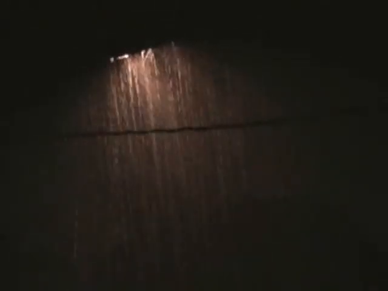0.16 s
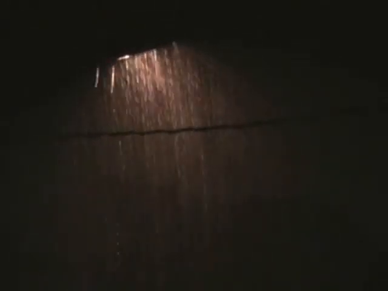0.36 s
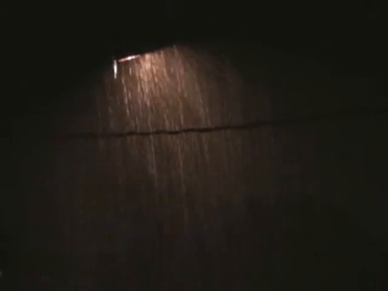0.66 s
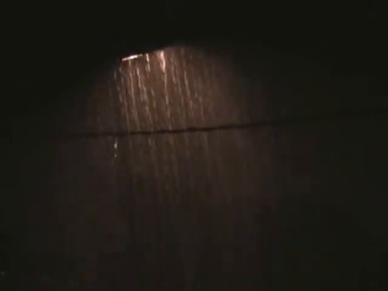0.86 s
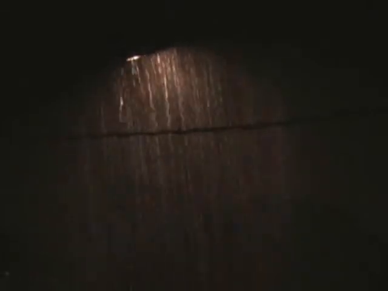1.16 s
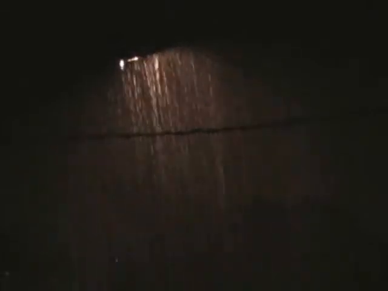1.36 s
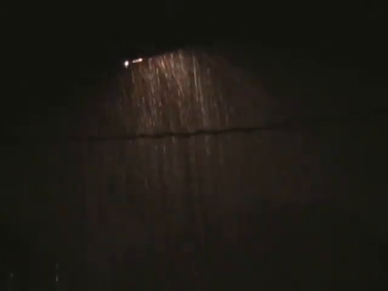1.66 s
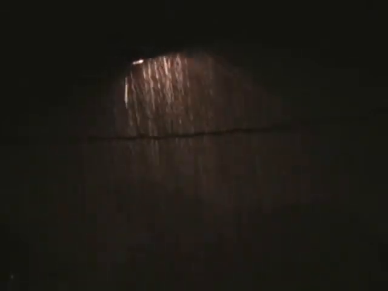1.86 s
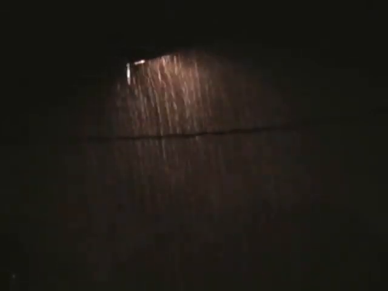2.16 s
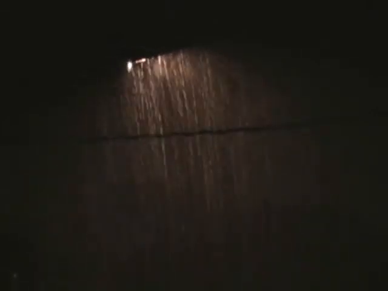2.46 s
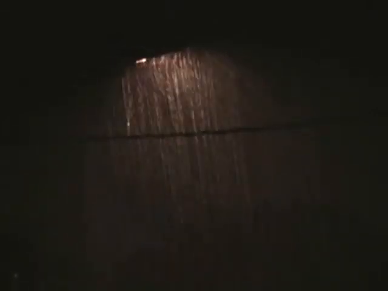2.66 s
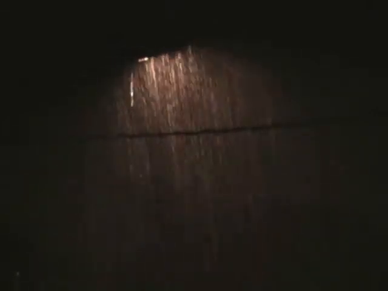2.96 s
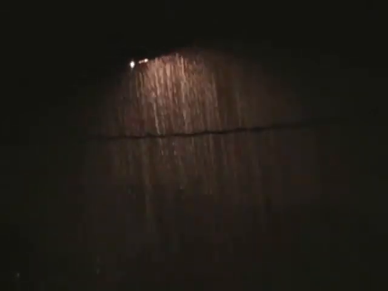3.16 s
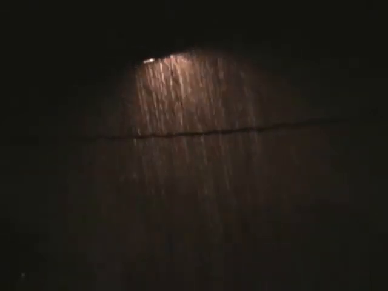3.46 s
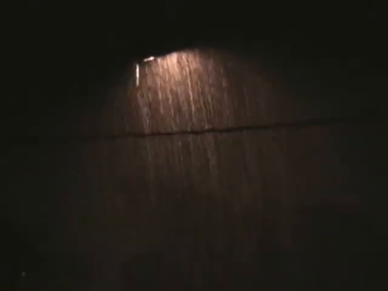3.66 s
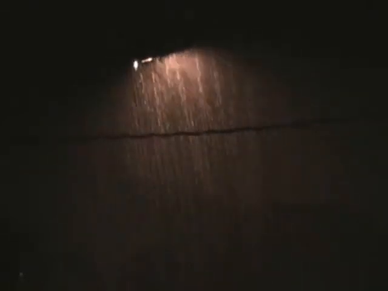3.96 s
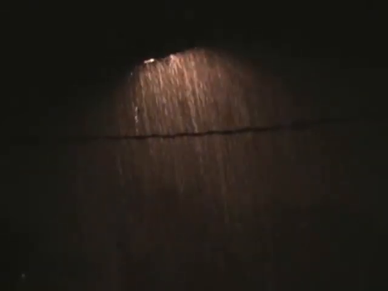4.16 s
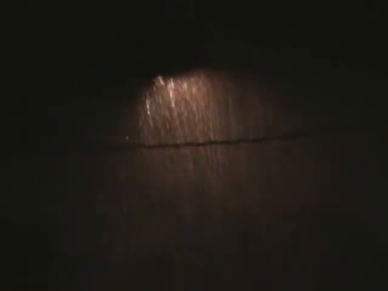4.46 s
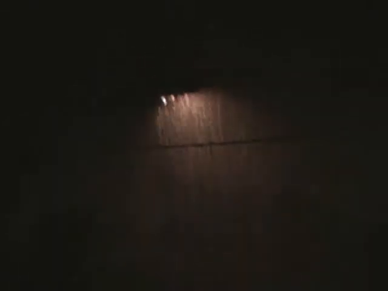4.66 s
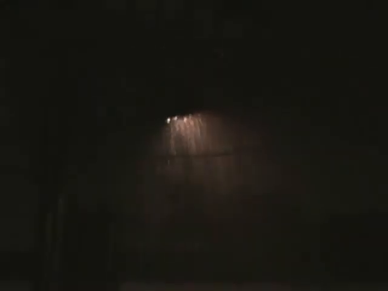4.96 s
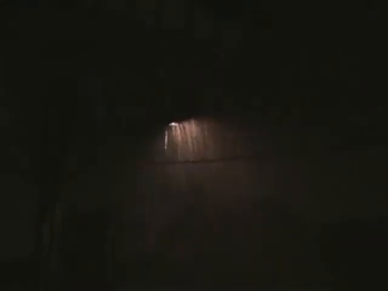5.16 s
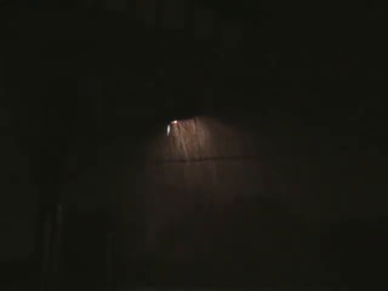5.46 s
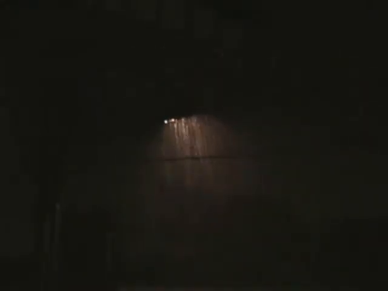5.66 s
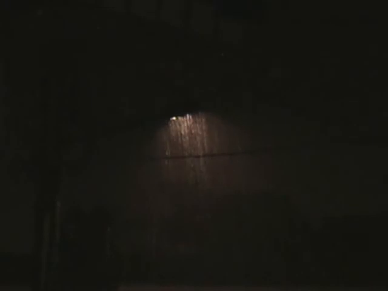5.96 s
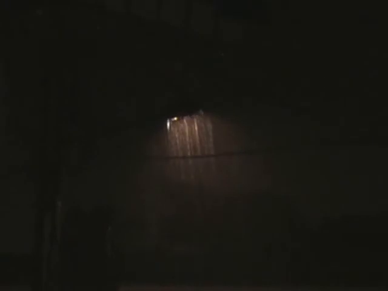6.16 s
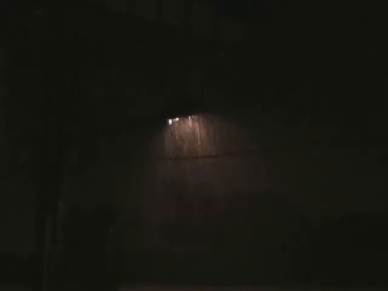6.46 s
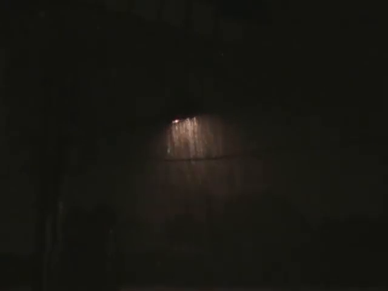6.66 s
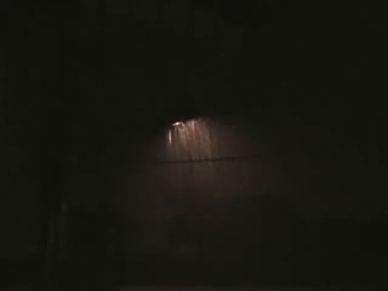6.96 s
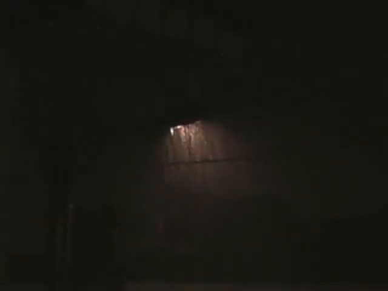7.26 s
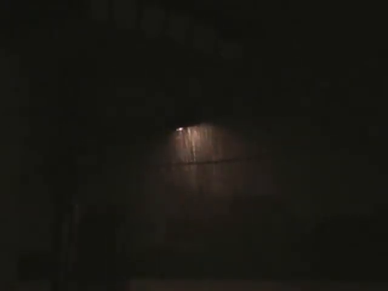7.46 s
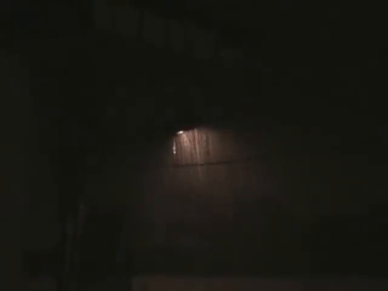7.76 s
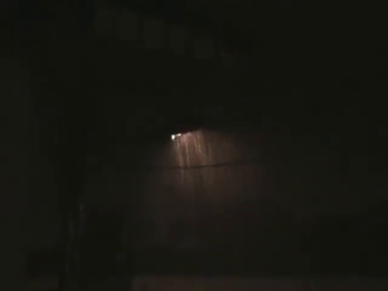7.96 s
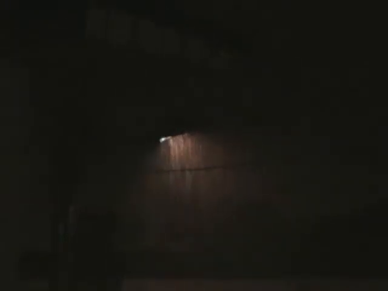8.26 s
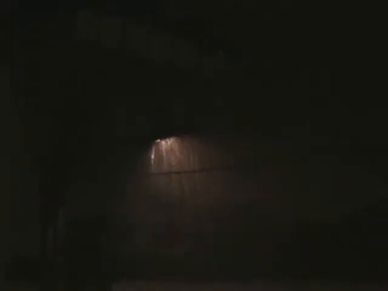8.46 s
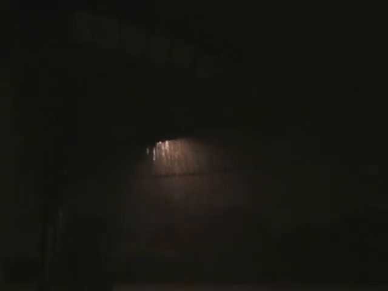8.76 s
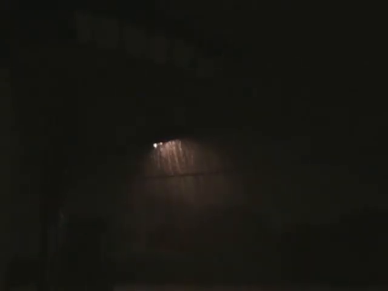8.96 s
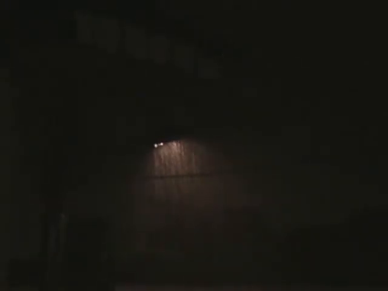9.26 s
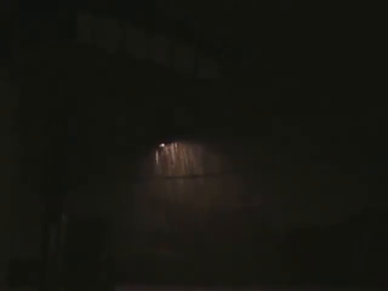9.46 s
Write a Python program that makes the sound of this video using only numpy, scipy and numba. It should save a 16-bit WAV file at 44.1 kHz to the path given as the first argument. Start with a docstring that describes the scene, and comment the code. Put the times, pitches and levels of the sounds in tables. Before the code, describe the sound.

A steady night downpour hisses on paving and drums softly on roofs, crackling with countless splashes and a few loud nearby drops.

```python
"""Heavy rain on roofs and paving, about ten seconds.
From the start, filtered noise gives a dull drumming and a bright hiss, while thousands of short
damped rings make splashes and patter; the hiss dips a little near 1, 4 and 7.5 s and at the end.
From 0.15 s on, big drops tick close by, the loudest at 7.25 s, and stray heavy drops fall at random.
A limiter ducks everything briefly around loud peaks, and the treble's stereo width flickers throughout."""
import sys
import numpy as np
from scipy import signal
from scipy.fft import rfft, irfft, next_fast_len
from scipy.io import wavfile
from scipy.ndimage import uniform_filter1d, minimum_filter1d, map_coordinates
from numba import njit

SR = 44100
rng = np.random.default_rng(int(sys.argv[2]) if len(sys.argv) > 2 else 0)


def magnitude_from_level(level_db):
    """Linear magnitude for a level in decibels (20 dB per decade)."""
    exponent = np.asarray(level_db, float) / 20
    return 10 ** exponent


def output_pcm(signal):
    """Save a mono or channel-first signal as 16-bit PCM at the path in sys.argv[1].

    Samples are clipped to [-1, 1] before scaling.
    """
    pcm = np.clip(np.atleast_2d(signal).T, -1, 1) * 32767
    wavfile.write(sys.argv[1], SR, np.round(pcm).astype(np.int16))


N = 424241  # length in samples


def unit(x):
    """Scale to rms 1."""
    return x / np.sqrt(np.mean(x ** 2) + 1e-20)


def along(points, hz):
    """Read a curve of (f/Hz, value) points, joined by straight lines on a log frequency axis."""
    f, value = np.transpose(points)
    return np.interp(np.log(hz + 1), np.log(f + 1), value)


def wobble(rate):
    """A smooth random curve through `rate` random points a second."""
    points = rng.standard_normal(int(N * rate / SR) + 4)
    return map_coordinates(points, [np.arange(N) * rate / SR])


def filtered(x, response):
    """Filter x by multiplying its spectrum by a (possibly complex) response of frequency."""
    size = next_fast_len(N + 8192)  # spare room keeps the end from wrapping onto the start
    spectrum = rfft(x, size) * response(np.fft.rfftfreq(size, 1 / SR))
    return irfft(spectrum, size)[..., :N]


# How alike the left and right noise are: (f/Hz, correlation)
LIKENESS = [(40, .82), (150, 0.93), (640, 0.77), (1400, 0.83), (3000, 0.84), (5500, 0.88), (8000, 0.94),
            (11000, 0.92), (15000, 0.2)]
# How much louder the noise is on the left than on the right: (f/Hz, level/dB)
LEFT_LOUDER = [(60, 0), (180, 3.5), (550, 2.5), (1650, 0.5), (4970, 1), (15000, -1.5)]
# How far the left noise runs ahead of the right: (f/Hz, phase/rad)
LEFT_AHEAD = [(0, 0), (600, 0.35), (1980, 0.042), (15300, -0.0)]


def rush(spectrum, patchy_db):
    """Many drops fused into stereo noise of rms 1, with patches of random gain, as two close ports hear it."""
    patches = signal.stft(rng.standard_normal((2, N)), nperseg=512)[2]
    field = rng.standard_normal(patches.shape[1:])
    field = uniform_filter1d(field, size=12, axis=0)  # smooth across frequency
    field = uniform_filter1d(field, size=8, axis=1)  # smooth across time
    pair = signal.istft(patches * magnitude_from_level(patchy_db * unit(field)), nperseg=512)[1][:, :N]

    def mid_and_side(hz):
        # a small angle gives mostly mid, so the two sides are much alike
        angle = np.arccos(np.clip(along(LIKENESS, hz), -1, 1)) / 2
        return magnitude_from_level(along(spectrum, hz)) * [np.cos(angle), np.sin(angle)]

    def left_and_right(hz):
        # each side takes half of the level and phase difference
        tilt = magnitude_from_level(along(LEFT_LOUDER, hz) / 2) * np.exp(.5j * along(LEFT_AHEAD, hz))
        return [tilt, 1 / tilt]

    mid, side = filtered(pair, mid_and_side)
    return unit(filtered(np.array([mid + side, mid - side]), left_and_right))


# Course of the rain before the random swell: (t/s, drumming level/dB, hiss level/dB)
RAIN_COURSE = [(0, -27, -17.5), (1, -27, -19), (2.3, -26, -17.5), (4, -27, -18.4), (4.8, -26.5, -17.5),
               (7.5, -26.5, -18.5), (9.62, -26.5, -19)]
# Relative spectrum of the roof drumming: (f/Hz, level/dB per Hz)
DRUMMING_SPECTRUM = [(20, -55), (45, -29), (72, -17), (198, -9), (297, -4), (743, -1.5), (1050, 1),
                     (1340, -4), (1520, -10.5), (2000, -5.5), (2600, -24), (4400, -120)]
# Relative spectrum of the splash hiss: (f/Hz, level/dB per Hz)
HISS_SPECTRUM = [(710, -44), (1200, -2), (1540, -2.5), (1800, -1), (2260, -1.5), (2710, 0.5), (5700, 0.5),
                 (8750, 0.5), (9430, -0.5), (11600, -12), (12400, -15.5), (13200, -27.5), (15000, -11),
                 (16000, -16)]


def downpour():
    """Far rain: dull noise for drumming roofs under bright noise for splashes, swelling together."""
    s, *levels = np.transpose(RAIN_COURSE)
    drum_db, hiss_db = [np.interp(np.arange(N) / SR, s, level) for level in levels]
    swell_db = .5 * wobble(6) + 0.48 * wobble(30)  # slow and quick random changes
    drumming = magnitude_from_level(drum_db + swell_db) * rush(DRUMMING_SPECTRUM, patchy_db=0.83)
    hiss = magnitude_from_level(hiss_db + swell_db) * rush(HISS_SPECTRUM, patchy_db=0.54)
    return drumming + hiss


# Colour of near drops at the microphone: (f/Hz, level/dB)
MIC_COLOUR = [(150, -20), (500, -3.5), (9000, -1.5), (11000, -8), (13000, -17), (16000, -30)]


def ticks(s, db, hz, pan_db, turns, size):
    """One damped ring per drop: it swells over `turns` cycles, then dies away; size is in samples."""
    u = np.arange(size) / SR * hz[:, None] / turns  # time, 1 where the swell is greatest
    phase = rng.uniform(0, 2 * np.pi, (len(s), 1))
    ring = u * np.exp(1 - u) * np.sin(2 * np.pi * turns * u + phase)
    at = (s[:, None] * SR).astype(int) + np.arange(size)
    at = np.clip(at, 0, N - 1).ravel()
    sides = []
    for side in (1, -1):  # left, right
        gain = magnitude_from_level(db + side * pan_db / 2)[:, None]
        sides.append(np.bincount(at, (gain * ring).ravel(), N))
    return filtered(np.array(sides), lambda f: magnitude_from_level(along(MIC_COLOUR, f)))


def scatter(count, db, hz, octaves, spread_db, most_db, turns, size):
    """Drops at random moments: many small, few large, none past the size at which a drop breaks up."""
    s, chance = rng.random((count, 2)).T
    pitch, pan = rng.standard_normal((count, 2)).T
    ring_hz = np.clip(hz * 2 ** (octaves * pitch), 300, 11500)  # hz is the middle pitch
    extra_db = np.minimum(-spread_db * np.log(1 - chance), most_db)
    return ticks(s * N / SR, db + extra_db, ring_hz, 3 * pan, turns, size)


def splashes():
    """Near drops bursting on hard paving: brief bright ticks."""
    return scatter(count=9000, db=-19.0, hz=8000, octaves=0.42, spread_db=4.0, most_db=13.5,
                   turns=0.98, size=96)


def patter():
    """Drops tapping a roof and puddles: lower, slightly longer plops."""
    return scatter(count=3000, db=-26.0, hz=1897, octaves=0.656, spread_db=3, most_db=12.5,
                   turns=1.02, size=400)


# The loudest near drops, before the microphone's colour:
# (t/s of the ring's peak, peak level/dB, ring f/Hz, left-over-right level/dB)
LOUDEST_DROPS = [(0.1473, 2, 6400, 1), (0.1887, 2, 9000, 4), (0.419, -2.5, 3700, 3), (0.776, -1.5, 5000, 4),
                 (1.4753, 1, 6670, -1), (1.4872, -1, 8400, -2), (1.6471, -1, 7200, 3.5),
                 (1.7227, 2.5, 5300, 1), (1.7654, 2.5, 8900, 2), (2.8514, 2, 9000, 0),
                 (3.5504, -1, 7550, 2), (3.9075, 5.5, 9300, -2), (4.1641, 1, 9100, -3),
                 (4.6587, 1, 6000, 0), (5.77, -1, 5300, 6), (6.5097, 2.5, 5800, 4), (6.9056, 0.5, 8400, 7),
                 (7.2496, 9, 7600, -2), (7.841, -4, 4400, -3), (7.8455, 2, 9000, 7), (9.3588, 2, 8670, 0),
                 (9.365, 5, 8000, -1), (9.4222, 2, 7100, 3), (9.4363, 3.5, 9100, 2)]


def big_drops():
    """The loudest drops close by: each ring's swell is greatest at its listed moment."""
    s, db, hz, pan_db = np.transpose(LOUDEST_DROPS)
    turns = 0.79
    return ticks(s - turns / hz, db, hz, pan_db, turns, size=400)


def stray_drops():
    """Now and then a heavy drop lands near, at a random moment, as a bright ring."""
    return scatter(count=30, db=-9.5, hz=6900, octaves=0.35, spread_db=4.0, most_db=4,
                   turns=.7, size=200)


def scene():
    """All the rain, far and near, added together."""
    return downpour() + splashes() + patter() + stray_drops() + big_drops()


@njit
def recover(need, step):
    """Gain falls at once to what is needed and creeps back towards 1."""
    gain = need.copy()
    for i in range(1, len(need)):
        gain[i] = min(need[i], gain[i - 1] + step * (1 - gain[i - 1]))
    return gain


def limiter(x, ceiling_db, ahead_s, release_s):
    """Both channels duck together, a little before each peak that would pass the ceiling."""
    need = np.minimum(1, magnitude_from_level(ceiling_db) / (np.abs(x).max(0) + 1e-9))
    ahead = int(ahead_s * SR)
    early = minimum_filter1d(need, 2 * ahead + 1)
    gain = recover(early, 1 / (release_s * SR))
    return x * uniform_filter1d(gain, ahead // 2 + 1)  # rounds off the steps


def width_flicker(x):
    """The treble flips unevenly between wide stereo and the same sound on both sides."""
    flickers_per_s, wide_bias, drift_rad = 2.9, .3, 1.5  # pace, lean towards wide, wander of the beat
    steady = 2 * np.pi * flickers_per_s * np.arange(N) / SR
    beat = np.cos(steady + drift_rad * wobble(flickers_per_s))
    wide = uniform_filter1d(1. * (beat + wide_bias > 0), size=900)  # softened switch
    treble_side = filtered((x[0] - x[1]) / 2, lambda hz: hz > 4000)
    lost = (1 - wide) * treble_side
    return x - [lost, -lost]


def top_cut(x):
    """Nothing passes above the cut-off."""
    return signal.sosfilt(signal.butter(12, 15250, fs=SR, output="sos"), x)


def record(dry):
    """Duck the loud peaks, then let the treble's width flicker."""
    held = limiter(dry, ceiling_db=-3.5, ahead_s=.0027, release_s=.016)
    mix = width_flicker(held)
    return top_cut(mix)


dry = scene()
out = record(dry)
output_pcm(out)
```